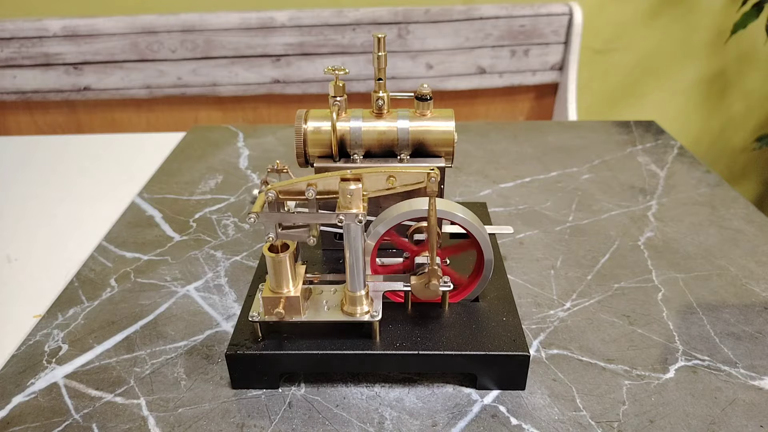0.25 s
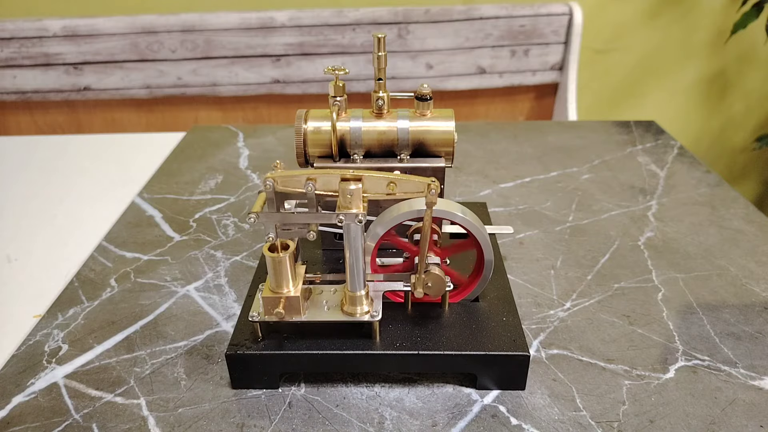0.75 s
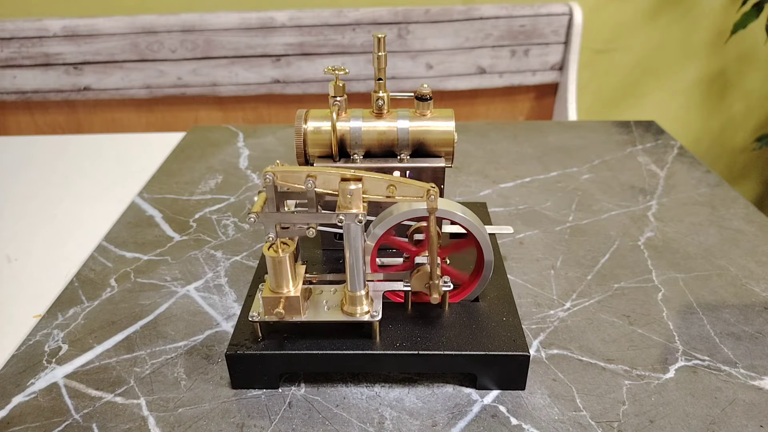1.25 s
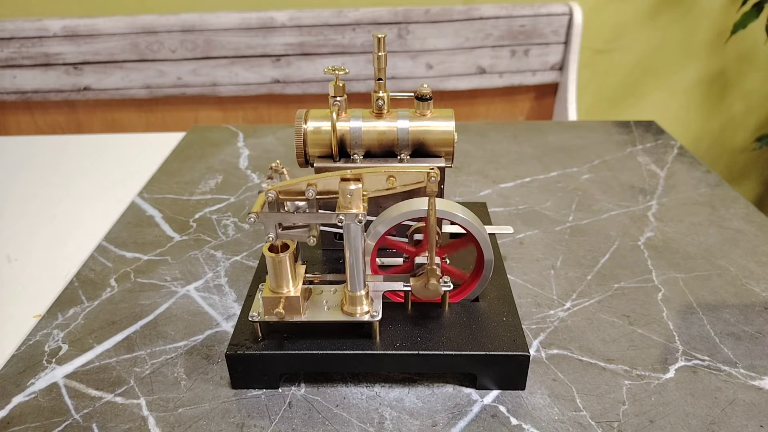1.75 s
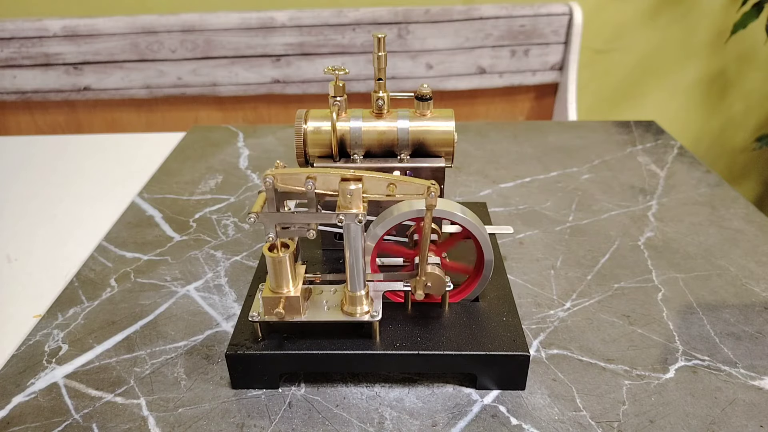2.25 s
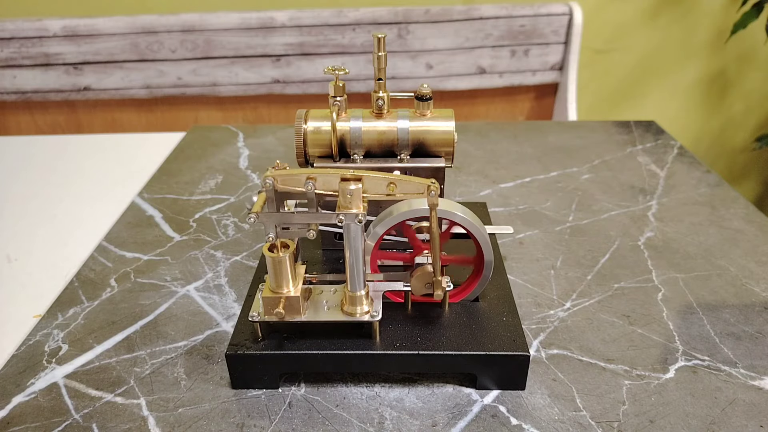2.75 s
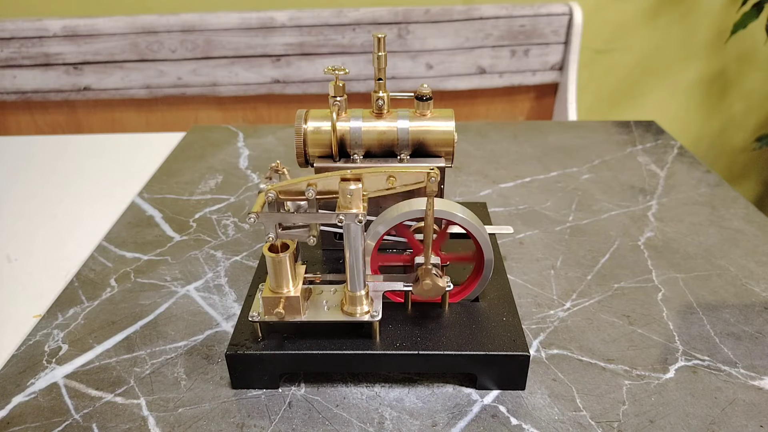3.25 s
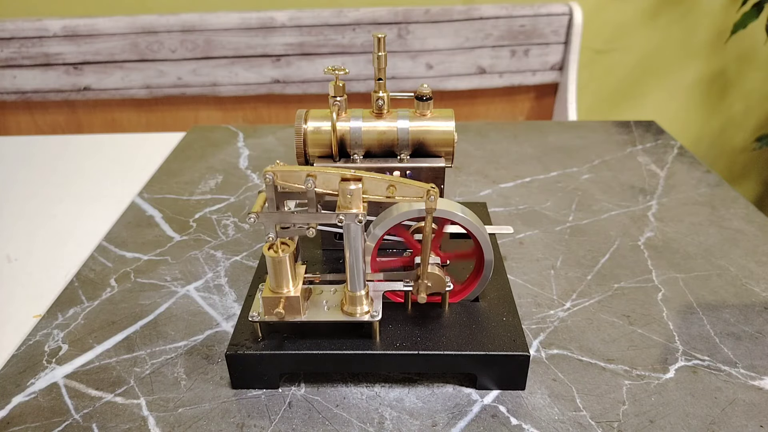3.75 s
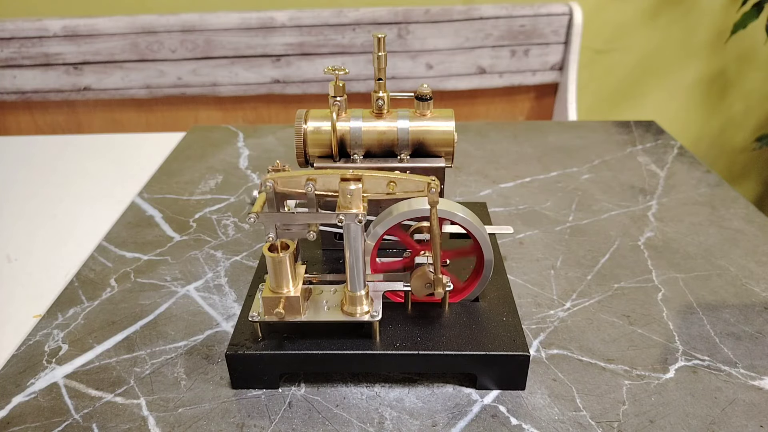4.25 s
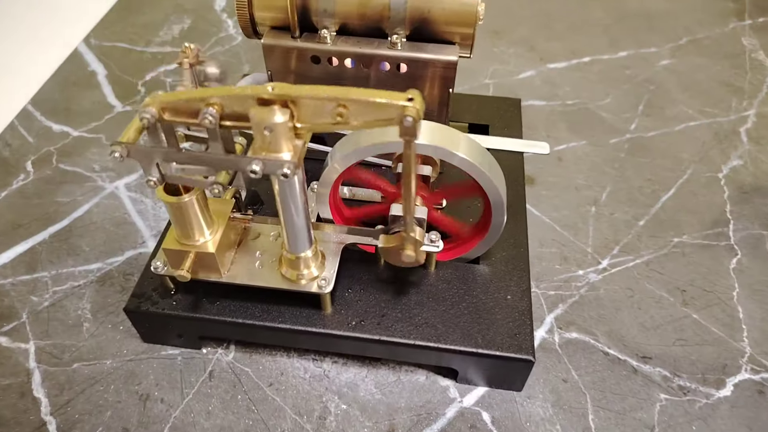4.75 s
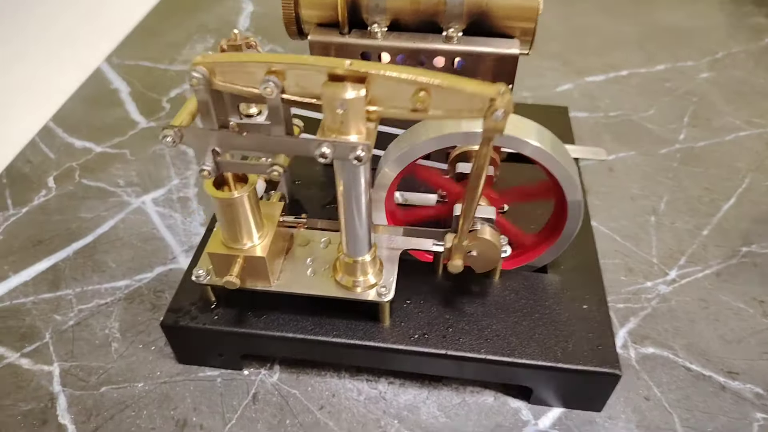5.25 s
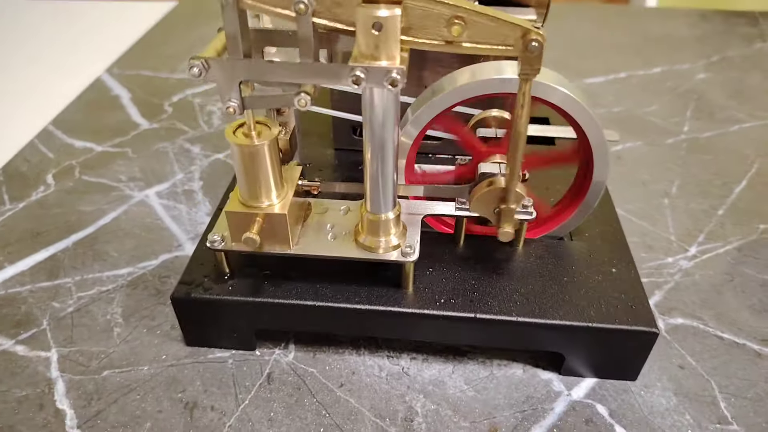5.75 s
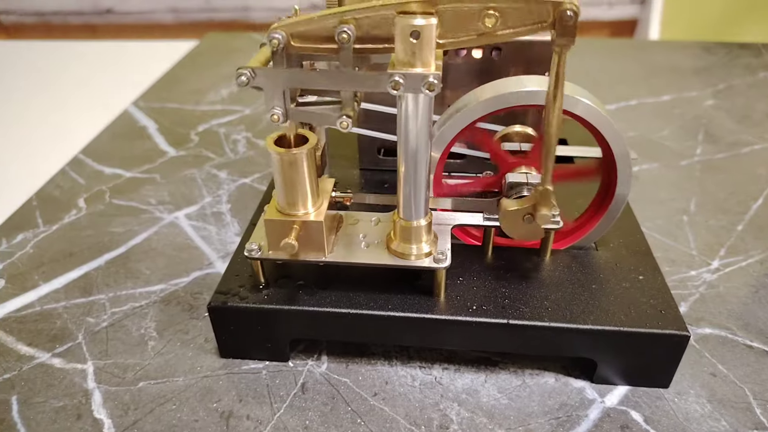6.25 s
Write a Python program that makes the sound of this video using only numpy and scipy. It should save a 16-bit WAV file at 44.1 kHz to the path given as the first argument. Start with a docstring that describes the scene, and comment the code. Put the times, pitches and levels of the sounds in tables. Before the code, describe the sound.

Rapid, even chuffing and metallic clatter come from a miniature steam engine in a small room. Loose brass linkage clicks and the crank knocks between wet, sputtering puffs, while steam leaks softly and droplets snap now and then. About three quarters of the way through, the sound drops out briefly. It resumes with the microphone nearer, a soft low bump follows, and the same rhythm carries on.

```python
"""A model beam engine runs on steam on a table in a small room, a little over three turns a second.
Each turn the slack linkage taps, the exhaust puffs, the crank knocks and rings, and the return stroke
puffs again. Steam leaks throughout; now and then a drop of water spits. At 4.5 s steam squeaks once.
At 4.7 s the sound drops out briefly and comes back from closer by, dull at first. A soft bump follows,
and the top octave opens again over the last turns."""
import sys
import numpy as np
from scipy import signal
from scipy.fft import rfft, irfft, next_fast_len
from scipy.io import wavfile
from scipy.ndimage import uniform_filter1d, map_coordinates

SR = 44100
rng = np.random.default_rng(int(sys.argv[2]) if len(sys.argv) > 2 else 0)


def put_to_file(sound):
    """Save the sound as 16-bit audio at rate SR, in the file named by the first command-line argument."""
    columns = np.atleast_2d(sound).T  # one column per channel
    safe = np.clip(columns, -1, 1)
    whole_steps = np.round(safe * 32767)
    wavfile.write(sys.argv[1], SR, whole_steps.astype(np.int16))


N = 286650
CLOSE_FROM_S = 4.715
AFAR = np.arange(N) < CLOSE_FROM_S * SR

# Bright edge of a hit, spectrum: f/Hz, level/dB
CRACK_SPECTRUM = [(100, -60), (500, -14), (2000, 1), (3800, 9.5), (4700, 1.5), (5600, 4), (6600, -5),
                  (7400, 4.5), (8800, -19), (10200, -8), (11300, -24), (12500, -11.5), (15500, -39)]
# Steel on brass, spectrum: f/Hz, level/dB
CLACK_SPECTRUM = [(60, -60), (200, -27), (900, -17), (1200, -11), (1850, 8), (2200, -17), (2700, 9.5),
                  (3100, -30), (3750, 3), (4150, 8), (4600, -25), (9000, -41)]
# Crank knocks, one a turn: t/s, level/dB, rod f/Hz
CRANK_KNOCKS = [(0.1935, -27.5, 3770), (0.4979, -29.5, 4140), (0.7993, -35, 3990), (1.1014, -28.5, 3530),
                (1.4016, -30, 3690), (1.702, -31, 3990), (2.0072, -31.5, 3870), (2.3093, -37.5, 3900),
                (2.6189, -31, 3880), (2.9255, -28, 3715), (3.2286, -31, 3770), (3.5319, -32, 3820),
                (3.834, -29.5, 3640), (4.1367, -30.5, 3960), (4.439, -34.5, 3520), (5.006, -31.5, 3600),
                (5.3023, -26.5, 3750), (5.5971, -27.5, 3770), (5.9002, -26, 3600), (6.1918, -26.5, 3530),
                (6.4917, -24.5, 3750)]


def crank_knocks(crack_db=-30.5, rod_afar_db=-9, rod_close_db=-20, rod_t60_s=0.3):
    """The crank pin hits its bearing and bounces; the loose rod rings, rising as its load changes."""
    out = np.zeros((2, N))
    t, rod_t = np.arange(SR // 8) / SR, np.arange(SR // 3) / SR
    flutter = (wobble(90) + 1j * wobble(90)) / np.sqrt(2)
    chatter = (decay(t, 0.022) + amp(-20) * decay(t, 0.1)) * attack(t, 0.0007)
    for s, db, rod_hz in CRANK_KNOCKS:
        add(out, s, amp(crack_db) * burst(CRACK_SPECTRUM, chatter))
        blow = amp(-6) * burst(CLACK_SPECTRUM, decay(t, 0.03) * attack(t, 0.0002))
        blow += brass_ring(t, tilt_db_oct=1, scatter_db=3.5, damping=1.24)
        bounce_s = rng.uniform(0.000967, 0.002033)
        add(blow, bounce_s, amp(-1) * brass_ring(t, tilt_db_oct=5.5, scatter_db=3, damping=2.4))
        settle_s = rng.uniform(0.005, 0.012)
        add(blow, settle_s, amp(-4.5) * brass_ring(t, tilt_db_oct=-3.5, scatter_db=2, damping=1.1))
        add(out, s, amp(db) * struck(blow))

        phase = 2 * np.pi * rod_hz * (rod_t + 0.24 * rod_t * (rod_t / 2 - 0.055))
        rod_flutter = np.roll(flutter, -round(s * SR))[:len(rod_t)]
        rod = np.real(np.exp(1j * phase) * (1 + 0.99 * rod_flutter))
        rod += 0.5 * np.sin(phase * (1 - rng.uniform(0.0085, 0.044)))  # second bending direction
        rod_db = db + (rod_afar_db if s < CLOSE_FROM_S else rod_close_db)
        add(out, s, amp(rod_db) * decay(rod_t, rod_t60_s) * attack(rod_t, 0.001) * rod)
    return out


# Linkage and flywheel modes: f/Hz, relative level/dB, t60/s at damping 1
BRASS_MODES = [(191, -33.5, 0.13), (306.5, -21, 0.13), (369, -18.5, 0.28), (498, -17.5, 0.13),
               (785, -15, 0.054), (1120, -23, .05), (1370, -21, 0.17), (1617, -12, 0.068),
               (1850, -1, 0.085), (2030, -4, 0.18), (2350, -3.5, 0.052), (2670, 6, 0.053), (2885, 1, 0.087),
               (3000, -12.5, 0.035), (3310, 13.5, 0.014), (3702, 5, 0.071), (3560, 5, 0.028),
               (3873, -20, 0.024), (3870, -1, 0.029), (3940, -2, 0.15), (4290, -31, 0.057)]


def brass_ring(t, tilt_db_oct, scatter_db, damping):
    """The brass rings with new mode strengths at every blow, in a different phase on each side."""
    hz, db, t60_s = np.transpose(BRASS_MODES)[:, :, None]
    strength, phase, detune, aim = rng.standard_normal((4, len(BRASS_MODES), 1))
    mode_db = db + scatter_db * strength + tilt_db_oct * octaves_above(hz, 1500)
    envelopes = amp(mode_db) * decay(t, t60_s / damping)
    angle = 2 * np.pi * hz * (1 + 0.012 * detune) * t + np.pi * phase
    sides = [np.sum(envelopes * np.sin(angle + side * 1.25 * aim), axis=0) for side in (-1, 1)]
    return struck(np.array(sides) * attack(t, 0.00017))


# Steam, mouth hiss and base plate spectra: f/Hz, level/dB
STEAM_SPECTRUM = [(100, -52), (300, -19.5), (550, -9.5), (900, -4.5), (1500, -1.5), (2700, -0.5),
                  (4000, -3), (4600, -16), (5400, -33), (8000, -55)]
HISS_SPECTRUM = [(2000, -51), (3800, -2), (4700, -0.5), (5400, -1), (6300, -3.5), (7300, -2), (8500, -6),
                 (10300, -12), (11200, -17.5), (12200, -15), (13500, -19.5), (15500, -22)]
PLATE_SPECTRUM = [(25, -40), (70, -23), (140, -8.5), (200, -1.5), (250, -7.5), (310, 4.5), (385, 5),
                  (470, -2.5), (600, 1), (1000, -20), (3000, -75)]
# Exhaust and frame resonances: f/Hz, width/Hz, gain afar/dB, gain close/dB
PIPE_RESONANCES = [(730, 16, 10.5, -4), (806, 8.3, 10, -1.5), (923, 110, 4, 3.5), (1164, 272, 10, 11),
                   (1340, 22, 4.5, 0), (1667, 12, 10.5, 6), (1826, 35, 7.5, 8), (1855, 320, 9, 6.5),
                   (1994, 103, 4.5, 5), (2316, 200, 6, 0), (3142, 84, 8.5, 11.5), (3383, 220, 12, 8.5),
                   (3680, 230, 5.5, 7.5)]
# Base puff levels, rows afar and close: power stroke/dB, return stroke/dB
PIPE_PUFF_DB = [(-38.5, -38.5), (-32.5, -34.5)]
HISS_PUFF_DB = [(-46.5, -45), (-39.5, -40.5)]
PLATE_PUFF_DB = [(-58.5, -69), (-53, -68.5)]


def exhaust():
    """Wet steam sputters through the pipe, hisses at its mouth and shakes the base plate."""
    def pipe_noise(close):
        return noise(lambda hz: along(STEAM_SPECTRUM, hz) + sum(
            resonance(hz, centre_hz, width_hz, gains_db[close])
            for centre_hz, width_hz, *gains_db in PIPE_RESONANCES))

    pipe = patchy(np.where(AFAR, pipe_noise(close=False), pipe_noise(close=True)), depth_db=2)
    sputter = wobble(260)
    pipe = unit(pipe * amp(1.8 * sputter))
    pipe *= valve_flow(PIPE_PUFF_DB, lead=0.9, shut_s=0.034, squareness=2.93, tail_db=-16, tail_s=0.15)
    hiss = unit(patchy(rush(HISS_SPECTRUM), depth_db=3.5) * amp(0.97 * sputter))
    hiss *= valve_flow(HISS_PUFF_DB, lead=0.98, shut_s=0.034, squareness=3.4, tail_db=-8.5, tail_s=0.062)
    hollow_base = noise(lambda hz: along(PLATE_SPECTRUM, hz) + resonance(hz, 210, width_hz=70, db=8))
    plate = np.where(AFAR, rush(PLATE_SPECTRUM), hollow_base)
    plate *= valve_flow(PLATE_PUFF_DB, lead=1.42, shut_s=0.048, squareness=3.9, tail_db=-10, tail_s=0.073)
    return pipe + hiss + plate


def valve_flow(levels_db, lead, shut_s, squareness, tail_db, tail_s):
    """The valve opens (lead scales how early), holds and shuts; the cylinder empties slowly."""
    power = np.zeros(N)
    for s, open_s, db in puffs(levels_db):
        i = np.arange(max(0, int(s * SR) - SR // 8), min(N, int(s * SR) + SR // 4))
        t = i / SR - s
        flow = np.exp(-np.abs(t / np.where(t < 0, lead * open_s, shut_s)) ** squareness)
        tail = amp(tail_db) * (t > 0) * (1 - flow) * np.exp(-np.abs(t) / tail_s)
        power[i] += (amp(db) * (flow + tail)) ** 2
    return np.sqrt(power)


# Slow exhaust drift: t/s, gain/dB
EXHAUST_DRIFT = [(0, -0.5), (0.7, 1.5), (1.1, 0), (2.0, 1.1), (3.7, 0.03), (4.15, 0), (4.6, 0.5),
                 (4.82, -5.5), (4.99, 1.2), (5.55, -3.5), (5.89, 2), (6.3, -2)]


def puffs(levels_db, turn_s=0.2964, power_lead_s=0.015, return_lag_s=0.12, scatter_db=1):
    """The crank times two puffs a turn; yields peak t/s, base opening time/s, level/dB."""
    power_open_s, return_open_s = 0.035, 0.038
    knock_s = np.transpose(CRANK_KNOCKS)[0]
    # both the far and the close stretch begin in mid-turn
    under_way_s = [knock_s[0] - turn_s, knock_s[knock_s > CLOSE_FROM_S][0] - turn_s]
    power = [(s - power_lead_s, power_open_s, 0) for s in knock_s]
    back = [(s + return_lag_s, return_open_s, 1) for s in [*knock_s, *under_way_s]]
    for s, open_s, stroke in power + back:
        base_db = levels_db[int(s > CLOSE_FROM_S)][stroke]
        drift_db = np.interp(s, *np.transpose(EXHAUST_DRIFT))
        yield s, open_s, base_db + drift_db + scatter_db * rng.standard_normal()


# Linkage reversals, about a quarter turn before each knock: t/s, level/dB
LINKAGE_TAPS = [(0.116, -40.5), (0.421, -39.5), (0.721, -40.5), (1.021, -41), (1.3225, -37.5), (1.621, -44),
                (1.9441, -41), (2.243, -44), (2.5499, -44.5), (2.8597, -41), (3.164, -42.5),
                (3.4667, -39.5), (3.7681, -42.5), (4.086, -37.5), (4.3736, -44), (4.9292, -35.5),
                (5.23, -33), (5.521, -34.5), (5.8178, -36), (6.1118, -36), (6.4181, -37)]


def linkage_taps():
    """The slack linkage reverses with a dry clack, brighter when harder; the base plate answers."""
    out, t = np.zeros((2, N)), np.arange(SR // 8) / SR
    mean_db = np.mean(LINKAGE_TAPS, axis=0)[1]
    for s, db in LINKAGE_TAPS:
        tilt_db_oct = -3.5 + 0.64 * (db - mean_db)
        tick = noise(lambda hz: along(CRACK_SPECTRUM, hz) - 8 * octaves_above(hz, 5000), len(t))
        tick = amp(-7) * struck(tick * decay(t, 0.028))
        tilt_db = lambda hz: tilt_db_oct * octaves_above(np.minimum(hz, 4000), 1500)
        clack = noise(lambda hz: along(CLACK_SPECTRUM, hz) + tilt_db(hz), len(t))
        clack = amp(-15) * struck(clack * decay(t, 0.046))
        brass = brass_ring(t, 1.7 * tilt_db_oct, scatter_db=2.4, damping=1.53)
        thud = amp(-18) * burst(PLATE_SPECTRUM, decay(t, 0.14))
        add(out, s, amp(db) * struck(brass + clack + tick + thud))
    return out


# Bursting drop, spectrum: f/Hz, level/dB
SPRAY_SPECTRUM = [(40, -87), (150, -50), (400, -26), (1200, -1), (2700, -12), (3500, 2.5), (5000, -5),
                  (6300, -6), (8000, -3), (10500, -12.5), (15500, -23)]
# Drops: t/s, level before trim/dB
WATER_SPITS = [(0.8868, -24.5), (1.4930, -34.5), (2.1036, -35.5), (2.7178, -40), (3.3255, -30.5),
               (5.1014, -36), (5.3975, -32), (6.2886, -32.5)]


def water_spits(trim_db=-6, t60_s=0.0039):
    """Condensed drops burst at the exhaust with a bright snap as the return stroke begins."""
    out, t = np.zeros((2, N)), np.arange(SR // 20) / SR
    for s, db in WATER_SPITS:
        add(out, s, amp(db + trim_db) * burst(SPRAY_SPECTRUM, decay(t, t60_s)))
    return out


def steam_squeak(start_s=4.512, length_s=0.079, db=-49.5, start_hz=8250, rise_hz_per_s=24000):
    """Steam squeezes past a drop: a thin, rough whistle that climbs as the gap narrows."""
    out, t = np.zeros((2, N)), np.arange(int(length_s * SR)) / SR
    phase = 2 * np.pi * t * (start_hz + rise_hz_per_s * t / 2)
    roughness = np.array([(wobble(1000) + 1j * wobble(1010))[:len(t)] for _ in range(2)])
    swell = np.sin(np.pi * (t / length_s) ** 0.64)
    add(out, start_s, amp(db) * swell * np.real(np.exp(1j * phase) * roughness))
    return out


def bump(start_s=4.869, db=-38.5, hz=69.6, t60_s=0.039):
    """A soft low bump: one damped sine."""
    out, t = np.zeros((2, N)), np.arange(SR // 5) / SR
    add(out, start_s, -amp(db) * decay(t, t60_s) * attack(t, 0.004) * np.sin(2 * np.pi * hz * t))
    return out


# Leaking steam, spectrum: f/Hz, level/dB
LEAK_SPECTRUM = [(100, -29), (350, -5), (700, 0.5), (1200, -0.5), (2000, 8), (3600, 0.5), (4500, -3),
                 (6200, -7.5), (7100, -1.5), (9000, -41), (12000, -34), (15500, -30)]


def steam_leak(afar_db=-58, close_db=-55, flicker_db=6.8):
    """Steam leaks all the time with a flickering rush."""
    return rush(LEAK_SPECTRUM) * amp(np.where(AFAR, afar_db, close_db) + flicker_db * wobble(25))


# Room decay: f/Hz, t60/s
ROOM_T60 = [(150, 0.215), (500, 0.71), (2000, 0.31), (6000, 0.45), (14000, 0.19)]


def room_reverb(x):
    """The walls answer each side with its own tail, 5 ms late."""
    hz, t, bins = signal.stft(rng.standard_normal((2, SR // 2)), SR, nperseg=256)
    tail = signal.istft(bins * decay(t, along(ROOM_T60, hz)[:, None]), SR, nperseg=256)[1]
    tail = np.pad(tail / np.linalg.norm(tail[0]), ((0, 0), (SR // 200, 0)))
    return signal.fftconvolve(x, tail, axes=1)[:, :N]


# Background spectrum: f/Hz, level/dB
HUSH_SPECTRUM = [(20, -12), (60, -16), (100, -8.5), (140, 1.5), (175, -10.5), (400, -5), (1500, -14),
                 (15000, -47)]


def hush(db=-72):
    """Faint, steady, low background noise."""
    return amp(db) * rush(HUSH_SPECTRUM)


# Engine balance: f/Hz, left minus right/dB
LEFT_BIAS = [(100, 0.5), (400, 1.5), (1200, 2.5), (2500, 2), (4400, 5), (6500, 4.5), (8500, -2.5),
             (14000, -.5)]


def placed_left(x, lead_s):
    """The engine stands a little to the left: earlier and mostly louder there."""
    side = np.array([[0.5], [-0.5]])
    lead = lambda hz: np.exp(2j * np.pi * hz * side * lead_s)
    return filtered(x, lambda hz: amp(side * along(LEFT_BIAS, hz)) * lead(hz))


# Noise width: f/Hz, left-right correlation
STEREO_CORRELATION = [(100, 0.79), (600, 0.93), (1500, 0.99), (4000, 0.27), (14000, 0.097)]


def noise(colour_db, size=N):
    """Stereo noise of rms 1, widest in the treble."""
    def mid_side_gains(hz):
        angle = np.arccos(np.clip(along(STEREO_CORRELATION, hz), -1, 1)) / 2
        return amp(colour_db(hz)) * [np.cos(angle), np.sin(angle)]

    mid, side = filtered(rng.standard_normal((2, size)), mid_side_gains)
    return unit(np.array([mid + side, mid - side]))


def rush(spectrum, size=N):
    return noise(lambda hz: along(spectrum, hz), size)


def burst(spectrum, envelope):
    return struck(rush(spectrum, len(envelope)) * envelope)


def patchy(x, depth_db):
    """Narrow bands swell and fade at random over tens of milliseconds."""
    bins = signal.stft(x, nperseg=1024)[2]
    field = uniform_filter1d(rng.standard_normal(bins.shape[1:]), size=4, axis=0)
    field = uniform_filter1d(field, size=4, axis=1)
    return unit(signal.istft(bins * amp(depth_db * unit(field)), nperseg=1024)[1][:, :N])


def wobble(knots_per_s):
    """Smooth random curve."""
    knots = rng.standard_normal(int(N * knots_per_s / SR) + 4)
    return map_coordinates(knots, [np.arange(N) * knots_per_s / SR])


def filtered(x, response):
    size = x.shape[-1]
    padded = next_fast_len(size + SR // 10)
    return irfft(rfft(x, padded) * response(np.fft.rfftfreq(padded, 1 / SR)), padded)[..., :size]


def along(points, hz):
    """Interpolate on a log frequency axis."""
    point_hz, values = np.transpose(points)
    return np.interp(np.log(hz + 1), np.log(point_hz + 1), values)


def resonance(hz, centre_hz, width_hz, db):
    return db / (1 + (2 * (hz - centre_hz) / width_hz) ** 2)


def octaves_above(hz, corner_hz):
    return np.log2(np.maximum(hz, corner_hz) / corner_hz)


def curve(rows):
    return np.interp(np.arange(N) / SR, *np.transpose(rows))


def amp(db):
    return 10 ** (np.asarray(db) / 20)


def attack(t, tau_s):
    return 1 - np.exp(-t / tau_s)


def decay(t, t60_s):
    return amp(-60 * t / t60_s)


def unit(x):
    return x / np.sqrt(np.mean(x ** 2) + 1e-20)


def struck(x):
    """Scale a hit to rms 1 over its first 8 ms."""
    return x / np.sqrt(np.mean(x[..., :SR // 125] ** 2))


def add(track, start_s, sound):
    part = track[:, round(start_s * SR):][:, :sound.shape[-1]]
    part += sound[..., :part.shape[1]]


def scene():
    """The engine from afar, then from close by with less of the room."""
    source = steam_leak() + exhaust() + crank_knocks() + linkage_taps() + water_spits() + steam_squeak()
    source = filtered(source, lambda hz: 1 - 1 / (1 + (hz / 95) ** 4))  # too small to radiate deep bass
    far = placed_left(source, lead_s=0.0001) * amp([[-0.3], [0.3]])
    close = placed_left(source, lead_s=0.00012) * amp([[0.2], [-0.2]])
    engine = np.where(AFAR, far, close)
    reverb = amp(np.where(AFAR, -10, -14)) * room_reverb(engine)
    return engine + reverb + hush() + bump()


# Top octave and overall level: t/s, gain/dB
TREBLE_GAIN = [(4.7, 3.5), (4.74, -44), (5.0, -13), (5.45, -4), (5.9, 1.5), (6.25, 6.5)]
DROPOUT_GAIN = [(4.6, -2.5), (4.692, -9.5), (4.698, -56), (4.73, -38), (4.737, -13.5), (4.78, -4),
                (4.82, -2.5)]


def record(dry, band_limit_hz=15650):
    """The sound drops out briefly and returns dull; the top octave then opens again."""
    treble = filtered(dry, lambda hz: np.clip((hz - 7700) / 700, 0, 1))
    dulled = dry + treble * (amp(curve(TREBLE_GAIN)) - 1)
    return filtered(dulled * amp(curve(DROPOUT_GAIN)), lambda hz: hz < band_limit_hz)


dry = scene()
out = record(dry)
put_to_file(out)
```